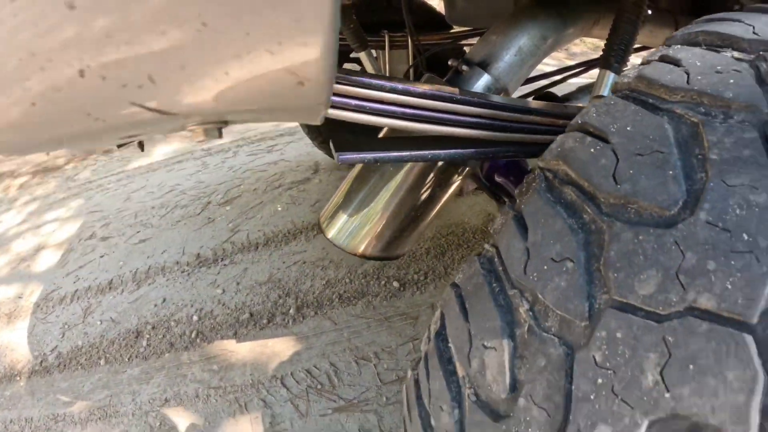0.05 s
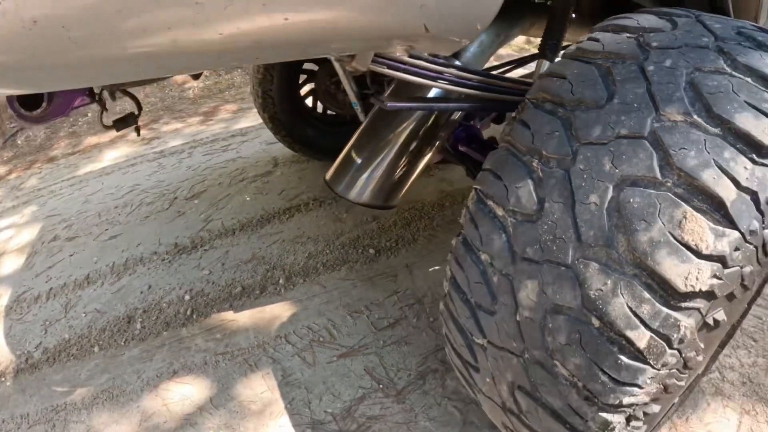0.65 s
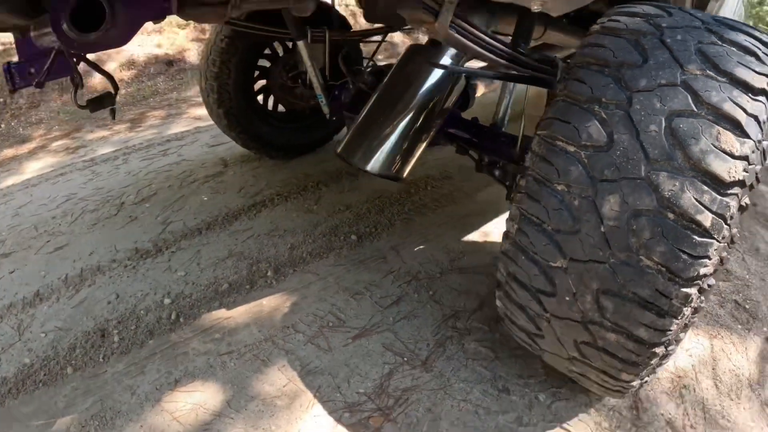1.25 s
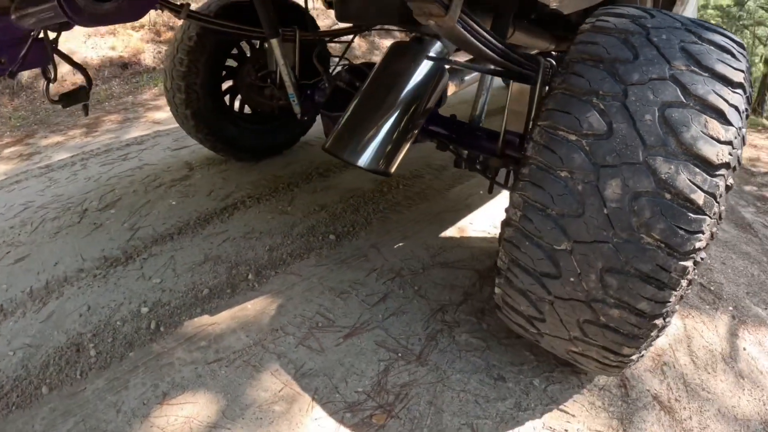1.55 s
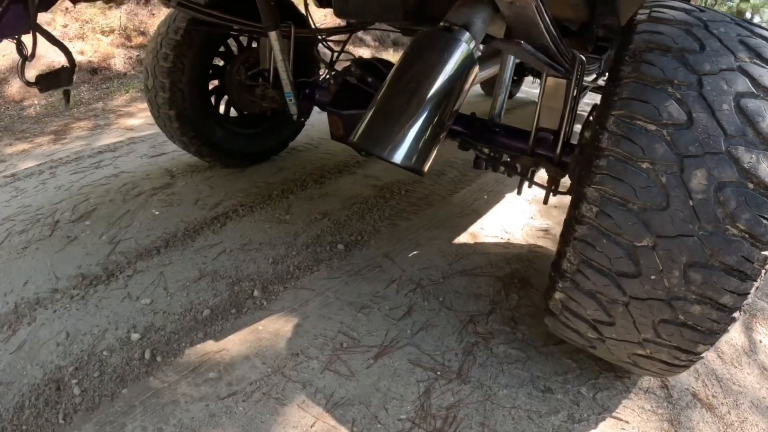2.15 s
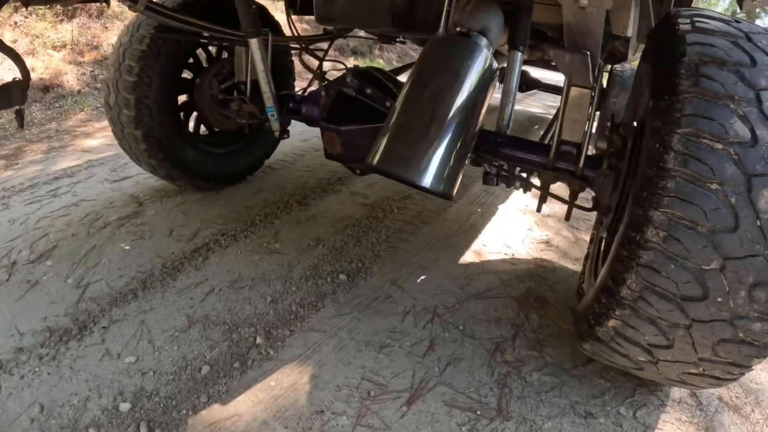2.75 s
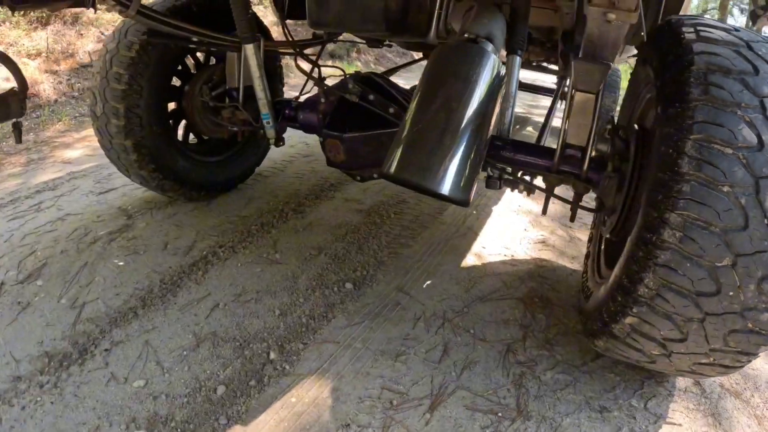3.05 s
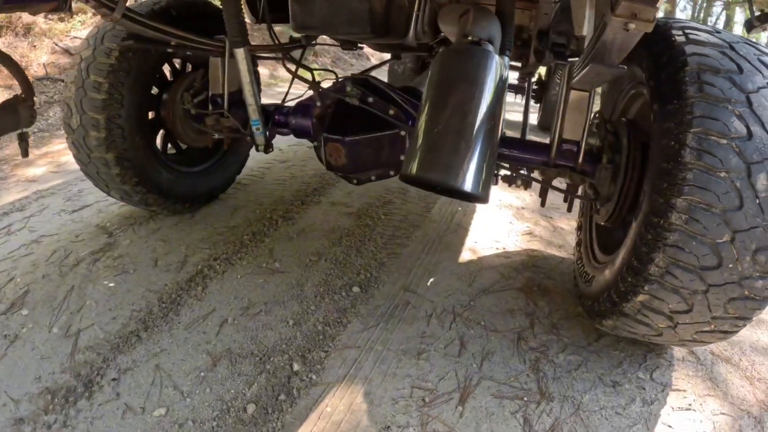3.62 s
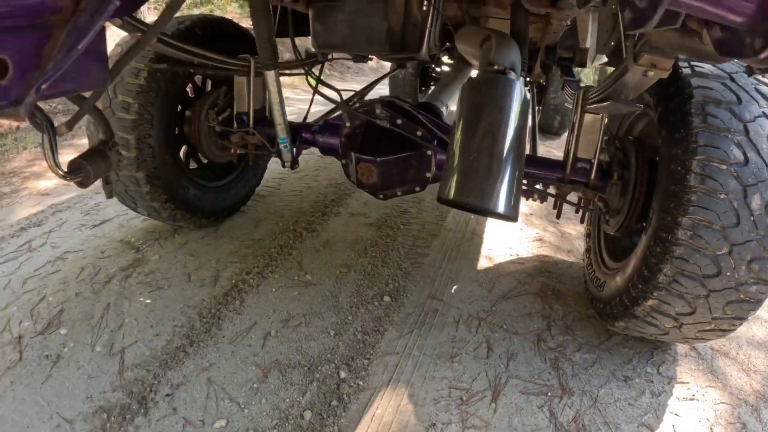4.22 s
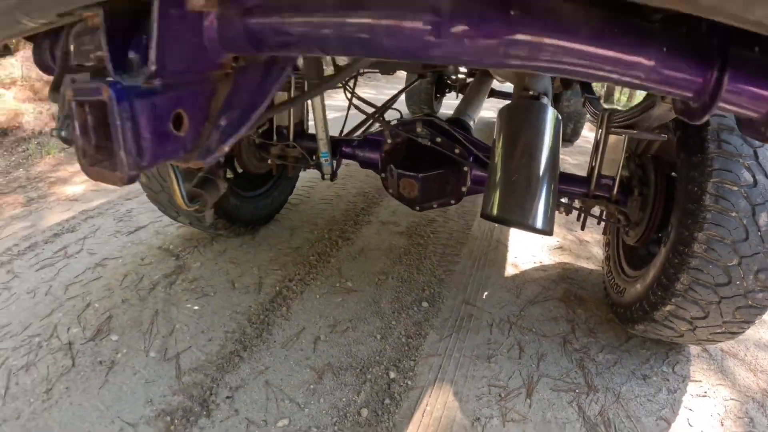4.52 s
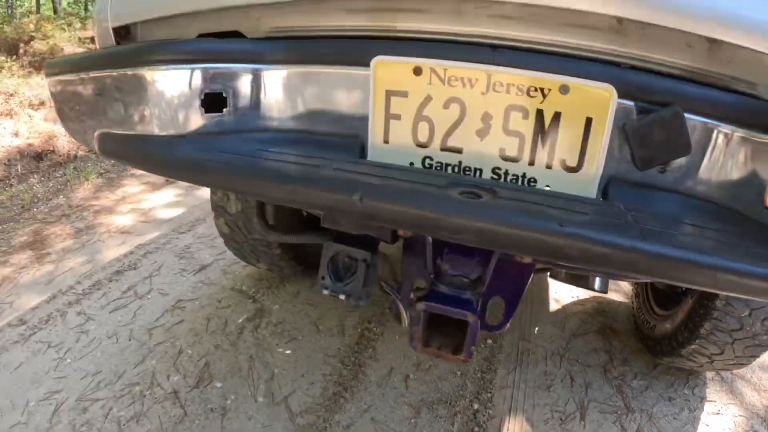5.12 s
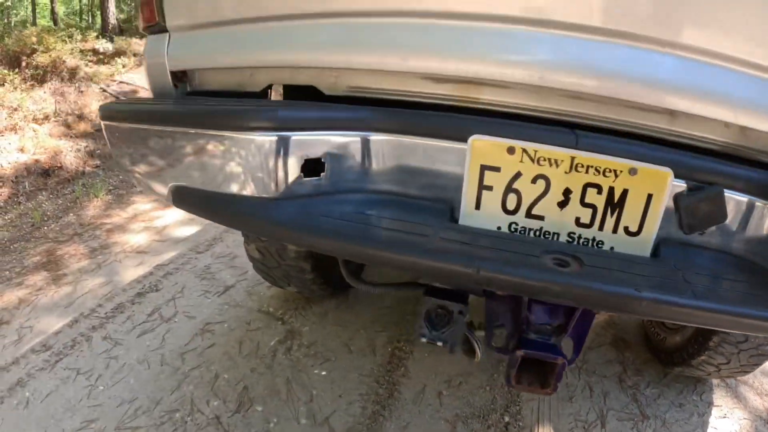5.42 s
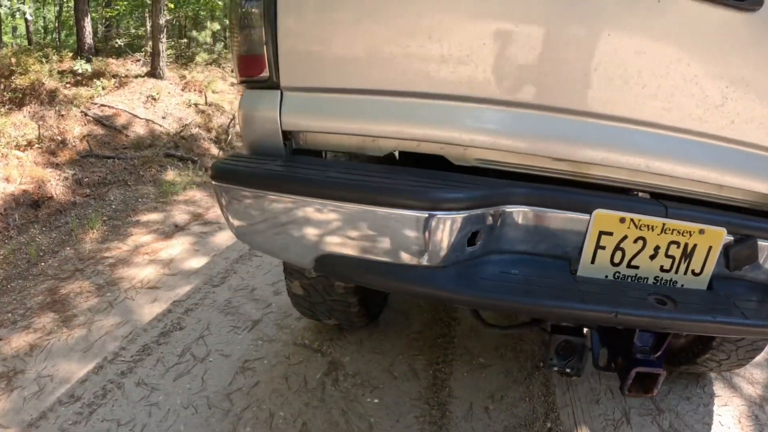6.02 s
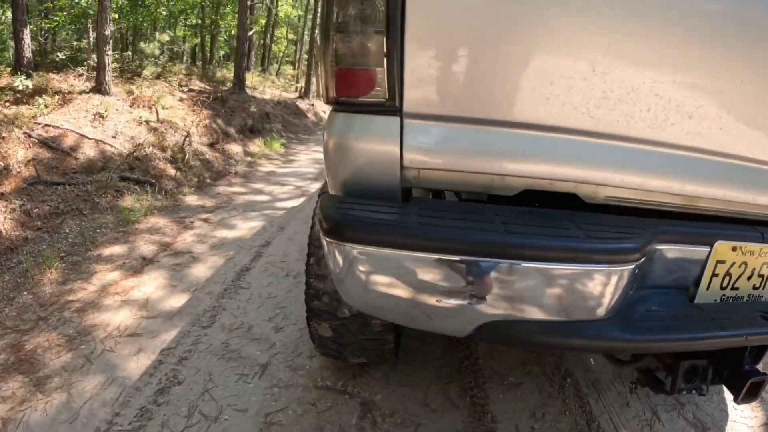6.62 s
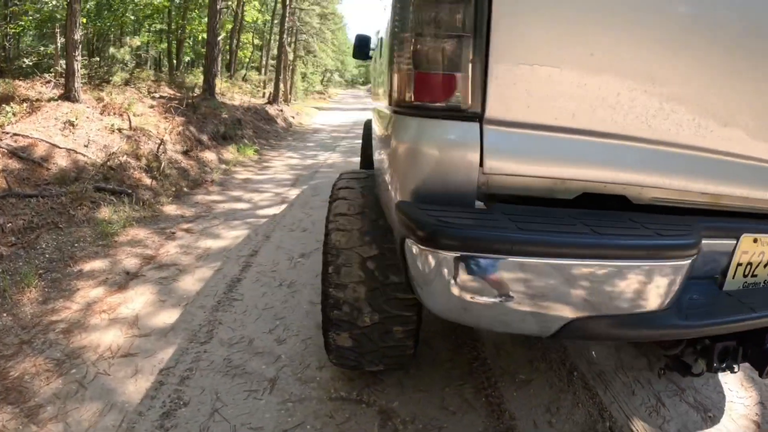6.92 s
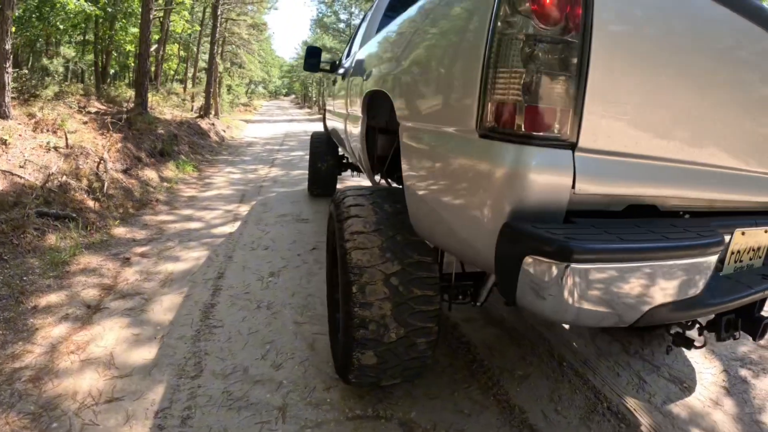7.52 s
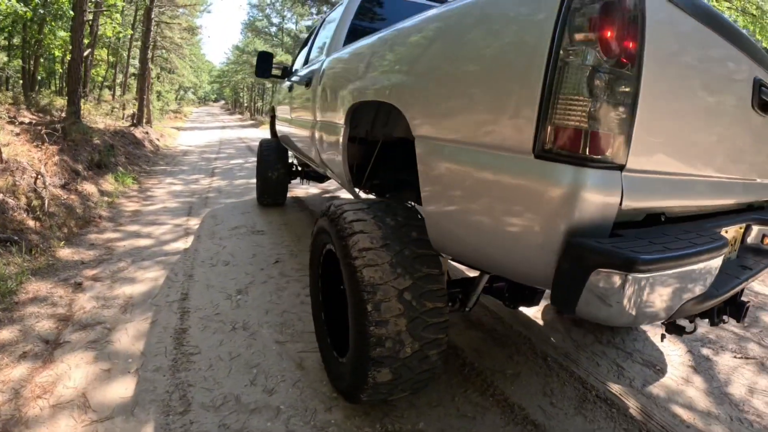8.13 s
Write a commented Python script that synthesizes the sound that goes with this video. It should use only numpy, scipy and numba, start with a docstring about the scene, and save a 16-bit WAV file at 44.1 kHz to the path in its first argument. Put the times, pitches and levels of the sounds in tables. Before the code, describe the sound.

A diesel pickup idles steadily on a dirt track in the woods. Its open tailpipe gives a deep, loping drone with a rapid hollow bark and rasping puffs of gas, over faint engine clatter. The microphone starts close to the pipe under the truck. About halfway through it backs out past the bumper and moves round to the side, so the idle becomes quieter, duller and wider.

```python
"""A V8 diesel pickup idles through a wide open tailpipe that points at a dirt track in the woods.
Every firing booms, barks in the pipe and blows out a rasping, hissing puff of gas; the uneven cylinders
give it a lope. Further forward the block knocks and gears whine. The microphone starts close to the
pipe, backs out past the bumper and ends beside the truck, and the balance and colour shift with it."""
import sys
import numpy as np
from scipy import signal
from scipy.fft import rfft, irfft, next_fast_len
from scipy.io import wavfile
from scipy.ndimage import uniform_filter1d, map_coordinates
from numba import njit

SR = 44100
rng = np.random.default_rng(int(sys.argv[2]) if len(sys.argv) > 2 else 0)


def put_to_file(sound):
    """Save the sound as 16-bit audio at rate SR, in the file named by the first command-line argument."""
    columns = np.atleast_2d(sound).T  # one column per channel
    safe = np.clip(columns, -1, 1)
    whole_steps = np.round(safe * 32767)
    wavfile.write(sys.argv[1], SR, whole_steps.astype(np.int16))


N = 364707
TIME = np.arange(N) / SR

# the eight firings of one cycle: bark lateness/firing intervals, bark/dB, rasp/dB, hiss/dB, pop f/Hz,
# pressure pulse lateness/firing intervals, pulse level/dB
CYLINDERS = [(-0.12, 3, -15, -5.5, 650, -0.0705, -2), (-0.073, 3.5, -13.5, -2.5, 640, -0.122, -0.8),
             (0.03, 3.5, -5, 1, 654, .04, 0.84), (-0.04, -4, -2, 1.5, 648, -.01, 3),
             (-.02, 4, -26.5, -3, 595, -.03, 3.5), (-.02, -4.5, -14.5, -3.5, 580, -0.0014, -0.5),
             (.05, -1.5, -3.5, 0.5, 590, .06, 1.82), (.03, 1, -7, -2, 600, 0.0437, 0.6)]
# colour of the rushing gas under the truck: f/Hz, level/dB
GAS_UNDER_TRUCK = [(300, -10.5), (450, 4.5), (600, 6), (760, 6.5), (930, -8), (1100, 1), (1300, 2.5),
                   (1550, -4), (1800, -14.5), (2600, -28), (9000, -77)]


def from_db(db):
    """Decibels to amplitude."""
    return 10 ** (np.asarray(db) / 20)


def in_time(rows):
    """Each column of an automation curve, sample by sample."""
    times, *columns = np.transpose(rows)
    return [np.interp(TIME, times, column) for column in columns]


def even(x):
    """Ride the level to unit power over two engine cycles."""
    power = np.mean(np.atleast_2d(x) ** 2, axis=0)
    return x / np.sqrt(uniform_filter1d(power, size=15550) + 1e-20)


def drift(rate):
    """Smooth random wobble through `rate` points a second."""
    return 0.86 * map_coordinates(rng.standard_normal(4000), [TIME * rate], order=3, mode="wrap")


def colour(x, spectrum):
    """Minimum-phase EQ through points of f/Hz, level/dB."""
    size = 2 * next_fast_len(N // 2 + 8000)
    hz, db = np.transpose(spectrum)
    bins_hz = np.arange(size // 2 + 1) * SR / size
    response = from_db(np.interp(np.log(bins_hz + 1), np.log(hz), db))
    cepstrum = irfft(np.log(response))
    cepstrum[1:size // 2] *= 2
    cepstrum[size // 2 + 1:] = 0
    return irfft(rfft(x, size) * np.exp(rfft(cepstrum)))[..., :N]


def sliding(x, spectrum, slide):
    """An EQ whose frequencies are all scaled by a moving factor."""
    samples, stretched = np.arange(N), np.cumsum(slide)
    coloured = colour(np.interp(samples, stretched, x), spectrum)
    return even(np.interp(stretched, samples, coloured))


def delayed(x, ms):
    """A delay whose length may move."""
    return np.interp(TIME - ms / 1000, TIME, x)


def clicks(times, heights):
    """One impulse at each moment."""
    inside = (times >= 0) & (times < (N - 1) / SR)
    return np.bincount((times[inside] * SR).astype(int), heights[inside], N)


@njit
def resonate(x, hz, width_hz):
    """A resonance whose centre moves."""
    r, out = np.exp(-np.pi * width_hz / SR), np.zeros(len(x))
    for i in range(2, len(x)):
        feedback = 2 * r * np.cos(2 * np.pi * hz[i] / SR) * out[i - 1] - r * r * out[i - 2]
        out[i] = x[i] - x[i - 2] + feedback
    return out


def scatter(x, t60):
    """Dense short reflections from the underbody and the trees."""
    age = TIME[:SR // 5]
    tail = rng.standard_normal(len(age)) * from_db(-60 * age / t60)
    return signal.fftconvolve(x, tail / np.linalg.norm(tail))[:N]


def idle(idle_rpm=681.5, sag_rpm_per_s=.19, hunt_rpm=2.0, hunt_hz=.78, first_firing_s=0.001467):
    """Running count of firings, four a revolution; the governor hunts around a slowly sagging speed."""
    rpm = idle_rpm - sag_rpm_per_s * TIME + hunt_rpm * np.cos(2 * np.pi * hunt_hz * (TIME - .99))
    return 4 * (np.cumsum(rpm) / SR - idle_rpm * first_firing_s) / 60


def firings(fired):
    """Time of every firing, with its cylinder's bark, rasp and hiss accents in dB."""
    number = np.arange(int(fired[-1]) + 1)
    late, *accents_db = np.array(CYLINDERS)[number % len(CYLINDERS), :4].T
    return np.interp(number + late, fired, TIME, left=.004, right=-1), *accents_db


def exhaust_tones(fired, beside):
    """The pulse train's boom and pipe drone; uneven cylinders put lines between the firing tones."""
    # exhaust tones: f/crank speed, level under the truck/dB, level beside it/dB
    orders = [(3.5, -35.5, -25), (4.0, 0, -1), (4.5, -25, -17), (5.0, -14, -8.5), (6.0, -11.5, -11),
              (6.5, -28, -21.5), (7.0, -17, -14.5), (8.0, -9, -6.5), (8.5, -23.5, -25.5),
              (9.0, -23.5, -13.5), (11.0, -30.5, -29.5), (12.0, -2, 0), (12.5, -20, -18), (13.0, -17, -13),
              (13.5, -31, -27), (14.0, -15.5, -19.5), (14.5, -25.5, -31), (15.0, -7, -15), (15.5, -15, -25),
              (16.0, -15.5, -21.5), (16.5, -17.5, -23.5), (17.0, -24.5, -33.5), (17.5, -24.5, -37.5),
              (18.5, -26.5, -29), (20.0, -18.5, -15.5), (20.5, -30, -32), (21.0, -30.5, -28),
              (21.5, -22, -23.5), (22.0, -25, -17), (22.5, -26.5, -19.5), (23.0, -34.5, -21.5),
              (25.0, -37, -18), (28.0, -32.5, -24.5)]
    late, pulse_db = np.array(CYLINDERS)[:, 5:].T
    slots = np.arange(len(late)) + late
    boom = drone = 0
    for order, under_db, beside_db in orders:
        per_firing = order / 4
        phase = np.angle(np.sum(from_db(pulse_db) * np.exp(-2j * np.pi * per_firing * slots)))
        waver = 1 + (0.01 if per_firing % 1 == 0 else 0.37) * drift(6.5)
        transit = 2.04 - 0.2 * per_firing   # in firings: deep tones take longer through the pipe
        level = from_db(under_db + beside * (beside_db - under_db)) * waver
        tone = -level * np.sin(2 * np.pi * per_firing * (fired - transit) + phase)
        if per_firing < 2.5:
            boom = boom + tone
        else:
            drone = drone + tone
    return even(boom), even(drone)


def flutter():
    """A bed of low, fluttering noise under the drone."""
    # colour of the flutter: f/Hz, level/dB
    spectrum = [(15, -4.5), (45, -11.5), (110, 2), (165, 6.5), (245, 4), (300, -8.5), (400, -12),
                (700, -48.5), (4000, -110)]
    return even(colour(rng.standard_normal(N), spectrum))


def pops(times, accent_db, beside, width_s=0.0018, jitter_s=.00012, rise_beside=0.086):
    """A short hollow pop at the pipe's mouth, at each cylinder's own pitch, higher from the side."""
    spread_db, detune, jitter = rng.standard_normal((len(times), 3)).T
    pitch = 1 + rise_beside * np.interp(times, TIME, beside) + .012 * detune
    hz = np.resize(np.array(CYLINDERS)[:, 4], len(times)) * pitch
    nearest = np.rint(np.interp(TIME, times[times > 0], np.flatnonzero(times > 0))).astype(int)
    age = TIME - (times + jitter_s * jitter)[nearest]
    envelope = from_db(accent_db + spread_db)[nearest] * np.exp(-.5 * (age / width_s) ** 2)
    return even(envelope * np.sin(2 * np.pi * hz[nearest] * age))


def hollow(drive):
    """The gap between ground and truck rings in three resonances that glide as the microphone moves."""
    # the resonances: t/s, then f/Hz, level/dB for each
    glides = [(0.7, 532, -9, 633, -1, 805, -19), (1.6, 570, 4.5, 602, -5, 805, -1.5),
              (3.3, 570, 0, 640, 1.5, 837, -33), (4.8, 569, 2, 606, -7.5, 708, -0.5),
              (5.8, 567, 3, 574, -8.5, 757, -9), (6.35, 500, 5, 680, 6, 766, -12.5),
              (6.8, 545, 4.5, 708, -5.5, 765, -3.5), (7.5, 594, -1, 715, -6.5, 823, -9.5),
              (8.2, 573, -4, 700, -10, 817, 15)]
    # their bandwidths: width/Hz
    widths = (30, 42, 65)
    curves = in_time(glides)
    ring = sum(from_db(db) * even(resonate(drive, hz, float(width)))
               for hz, db, width in zip(curves[::2], curves[1::2], widths))
    power = uniform_filter1d(ring ** 2, size=1400) + 1e-9
    return even(ring / power ** .25)   # 2:1 compression steadies the ring


def bark(times, accent_db, beside, round_trip_ms=9.45, smear_ms=0.2, reflection=0.42):
    """Each pop returns along the pipe, smeared by the moving gas; pops, returns and gas ring the hollow."""
    mouth = pops(times, accent_db, beside)
    returns = delayed(mouth, round_trip_ms + smear_ms * drift(30))
    gas = even(colour(rng.standard_normal(N), GAS_UNDER_TRUCK))
    ring = hollow(.55 * mouth + returns + .55 * gas)
    direct = even(mouth + reflection * returns)
    direct_share = .55 * (1 - .55 * beside)
    return even(np.sqrt(1 - direct_share) * ring + np.sqrt(direct_share) * direct)


def puffs(times, accent_db, rise_s, steady, spread_db, grain_db):
    """Turbulent gas: a swell after each firing on top of a steady flow, broken into eddies."""
    kicks = clicks(times, from_db(accent_db + spread_db * rng.standard_normal(len(times))))
    age = TIME[:SR // 8] / rise_s
    swell = signal.fftconvolve(kicks, age * np.exp(1 - age))[:N]
    return (steady + swell) * from_db(grain_db * drift(350)) * rng.standard_normal(N)


def rasp(gas, beside, echo_ms, under_slide, side_slide):
    """Gas combed by its echo off the dirt, crossfading from the colour under the truck to the side's."""
    # colour of the rushing gas beside the truck: f/Hz, level/dB
    gas_beside_truck = [(300, 6), (450, -4.5), (580, -5), (660, -5.5), (780, 2.5), (880, 2.5), (1020, 8),
                        (1250, -6.5), (1550, 2), (1950, -21), (2500, -13.5), (3000, -12), (3400, -16.5),
                        (5000, -29), (9000, -74.5)]
    combed = gas + 0.36 * delayed(gas, echo_ms)
    under = sliding(combed, GAS_UNDER_TRUCK, under_slide)
    side = sliding(combed, gas_beside_truck, side_slide)
    return even(np.sqrt(1 - beside) * under + np.sqrt(beside) * side)


def flank_ring(gas, slide):
    """The gas rings along the truck's flank, gliding up with the side colour."""
    return even(resonate(gas, hz=968 * slide, width_hz=33.0))


def hiss(times, accent_db):
    """The bright edge of the gas jet, swelling softly with each firing."""
    # colour of the jet: f/Hz, level/dB
    spectrum = [(300, -41.5), (1200, -7), (1800, -0.5), (2050, 2.5), (2450, 2), (3050, -5.5), (3400, -10.5),
                (4100, -8), (5000, -13), (6200, -16.5), (7500, -23.5), (9800, -30.5), (11500, -43.5),
                (13800, -42.5), (15000, -68.5)]
    jet = puffs(times, accent_db, rise_s=.008, steady=.75, spread_db=1.5, grain_db=1.5)
    return even(colour(jet, spectrum))


def knock(times, accent_db, lag_s=.004, jitter_s=.0012, spread_db=3, top_hz=6500):
    """Injectors, combustion and valves strike the block; the underbody scatters the clatter."""
    # modes of the block and injectors: f/Hz, level/dB, t60/s
    modes = [(1245, 0.5, 0.05), (1483, 0, 0.054), (1572, 4.5, 0.055), (2015, -3, 0.066), (2210, -3, 0.066),
             (2436, 1.5, 0.02), (2670, -2, 0.047), (3365, -3, 0.013), (3660, -11.5, 0.015),
             (4072, -9, 0.03), (4840, -16, 0.012), (5860, -17.5, 0.02)]
    # the strikes of one firing: t/s after the first, level/dB
    strikes = [(0, -1), (.005, -2.5), (.011, -3), (.016, -4)]
    after_s, strike_db = np.transpose(strikes)
    hit_s = np.add.outer(times + lag_s, after_s).ravel()
    hit_db = np.add.outer(accent_db, strike_db).ravel()
    clatter = 0
    for hz, level_db, t60 in modes:
        jitter, spread = rng.standard_normal((len(hit_s), 2)).T
        blows = clicks(hit_s + jitter_s * jitter, from_db(hit_db + spread_db * spread))
        r, w = from_db(-60 / (t60 * SR)), 2 * np.pi * hz / SR
        ring = signal.lfilter([1, 0, -1], [1, -2 * r * np.cos(w), r * r], blows + 1e-18)
        clatter = clatter + from_db(level_db) * even(ring)
    clatter = signal.sosfilt(signal.butter(2, top_hz, fs=SR, output="sos"), clatter)
    return even(clatter + scatter(clatter, t60=.06))


def whine(fired, waver_db=2.8, wander_rad=.65, roughness=.35):
    """Meshing gears sing in step with the crank, unsteadily and a little roughly."""
    # gear tones: f/crank speed, level/dB
    orders = [(92, -17), (96, 2)]
    turns, tone = fired / 4, 0
    for order, db in orders:
        level = from_db(db + waver_db * drift(9))
        tone = tone + level * np.sin(2 * np.pi * order * turns + wander_rad * drift(10))
    return even(tone * (1 + roughness * drift(70)))


def thin_hiss(level_db=-82.5):
    """A faint, steady sheen of high noise, wide in stereo."""
    # colour of the sheen: f/Hz, level/dB
    spectrum = [(1000, -0.5), (9500, -9), (11300, -6.5), (12500, 8.5), (13800, 6), (14400, -3),
                (15000, -15.5)]
    return from_db(level_db) * even(colour(rng.standard_normal((2, N)), spectrum))


def spits(slide, width_s=0.0047):
    """Now and then a puff tears into a sharper, brighter spit."""
    # spits of gas: t/s, level/dB
    cues = [(.245, -32.5), (0.401, -30), (0.418, -28), (0.773, -32), (.95, -35), (1.3, -35), (1.656, -33),
            (1.835, -38), (1.994, -28), (2.01, -28), (2.077, -29), (2.341, -29), (2.361, -31), (2.534, -28),
            (3.047, -29), (3.24, -28), (3.415, -30), (3.941, -35), (5.797, -43), (5.87, -35), (5.884, -44),
            (7.72, -36)]
    # colour of a spit: f/Hz, level/dB
    spectrum = [(300, -23.5), (900, -4), (1150, 7), (1450, 4.5), (1900, -9.5), (3500, -25.5), (6000, -24),
                (10000, -52.5), (15000, -70)]
    swell = sum(from_db(db) * np.exp(-.5 * np.minimum(((TIME - s) / width_s) ** 2, 100))
                for s, db in cues)
    return swell * sliding(rng.standard_normal(N), spectrum, slide)


def faders(tyre, raised, beside, close_db=-15):
    """Layer gains along the walk: each follows one loudness at its own slope, shaded by the truck."""
    # loudness curve of the exhaust's low end: t/s, level/dB
    loudness = [(0.1, -15), (3.43, -15), (3.62, -17.5), (3.93, -19.5), (4.3, -18), (4.66, -17),
                (4.83, -19.5), (5.05, -20.5), (5.86, -18.5), (6.05, -21), (6.25, -20.5), (6.65, -19),
                (7.05, -18.5), (8.15, -19)]
    # how each layer carries: close level/dB, slope/(dB per dB), dB added behind the tyre, raised, beside
    carry = {"boom": (-17.5, 1.5, -1, 1.5, -1), "drone": (-18.5, 1.76, -3, 2, 2.5),
             "bark": (-23.5, 2.07, 2.25, -5.5, -2), "rasp": (-30, 1.93, -3.5, 4.5, -1),
             "hiss": (-43.5, 2.6, -1.9, -4, 4.8), "knock": (-43.5, 1, -5, -2.5, 4.5),
             "whine": (-39.5, 2.5, -8.5, 6, 1.5), "flank": (-52, 4.5, 2, -1.5, 17.5)}
    change_db = in_time(loudness)[0] - close_db
    return {layer: from_db(db + slope * change_db + tyre * tyre_db + raised * up_db + beside * side_db)
            for layer, (db, slope, tyre_db, up_db, side_db) in carry.items()}


def stereo(x, lag_samples=.7):
    """The image opens and closes: mono at spread 0, diffuse with a slight left lag at 1."""
    # how wide the sound is: t/s, spread/0-1
    stereo_spread = [(3.6, 0), (4.5, 0.8), (4.75, 0.7), (5.3, 0), (5.95, 0.01), (6.9, 1), (8.2, 0.98)]
    # width of the scatter at full spread: f/Hz, side-to-mid level/dB
    width = [(40, -33.5), (80, -30.5), (160, -21.5), (330, -14), (650, -12.5), (1300, -8), (3000, -9),
             (6000, -13), (10000, -18.5)]
    diffuse = colour(scatter(x, t60=0.17), width)
    side = in_time(stereo_spread)[0] * (diffuse - lag_samples / 2 * np.gradient(x))
    return x + side * np.array([[1], [-1]])


def scene(corner_s=5.64, rasp_lead_s=0.0031):
    """Tailpipe and engine, mixed along the walk around the truck."""
    # microphone position: t/s, then shares/0-1 behind the rear tyre, above the bumper, beside the truck
    walk = [(0.2, 0.52, 0.18, 0), (1.4, 0.37, 0.2, 0.049), (2.4, 0, 0.11, 0.011), (3.5, 0.076, 0.18, 0.09),
            (4.7, 0.22, 0, 0.17), (5.5, 0.67, 0.97, 0.27), (6.9, 0.71, 0.86, 0.85),
            (8.2, 0.085, 0.64, 0.97)]
    tyre, raised, beside = np.clip(in_time(walk), 0, 1)
    gain = faders(tyre, raised, beside)
    echo_ms = 1.44 + 0.21 * tyre + 0.86 * raised
    under_slide = 1 - 0.11 * tyre   # the gas sounds lower behind the tyre
    side_slide = 0.896 + 0.066 * np.maximum(TIME - corner_s, 0)   # rises as reflected paths shorten
    fired = idle()
    times, bark_db, rasp_db, hiss_db = firings(fired)
    boom, drone = exhaust_tones(fired, beside)
    mix = gain["boom"] * boom + gain["drone"] * (drone + from_db(-14.5) * flutter())
    mix += gain["bark"] * bark(times, bark_db, beside)
    gas = puffs(times - rasp_lead_s, rasp_db, rise_s=0.0042, steady=0.4, spread_db=1.8, grain_db=0.5)
    mix += gain["rasp"] * rasp(gas, beside, echo_ms, under_slide, side_slide)
    mix += gain["flank"] * flank_ring(gas, side_slide)
    mix += gain["hiss"] * hiss(times, hiss_db)
    mix += gain["knock"] * knock(times, .5 * hiss_db)
    mix += gain["whine"] * whine(fired)
    return thin_hiss() + stereo(mix + spits(under_slide))


def record(dry, cutoff_hz=15100):
    """A steep low-pass trims the very top."""
    return signal.sosfilt(signal.ellip(10, .1, 80, cutoff_hz, fs=SR, output="sos"), dry)


dry = scene()
out = record(dry)
put_to_file(out)
```